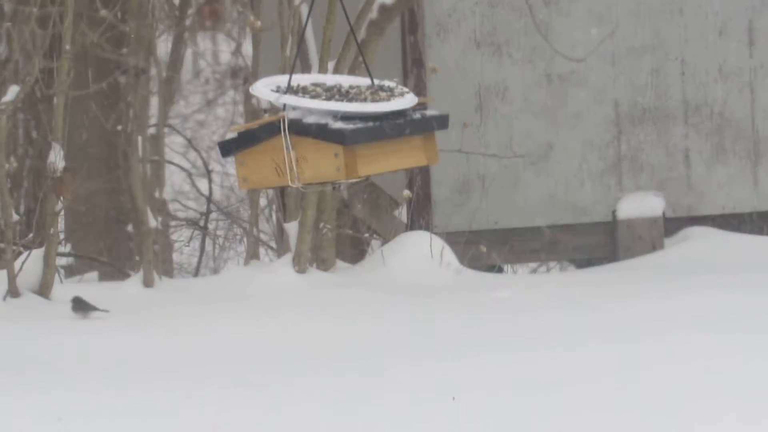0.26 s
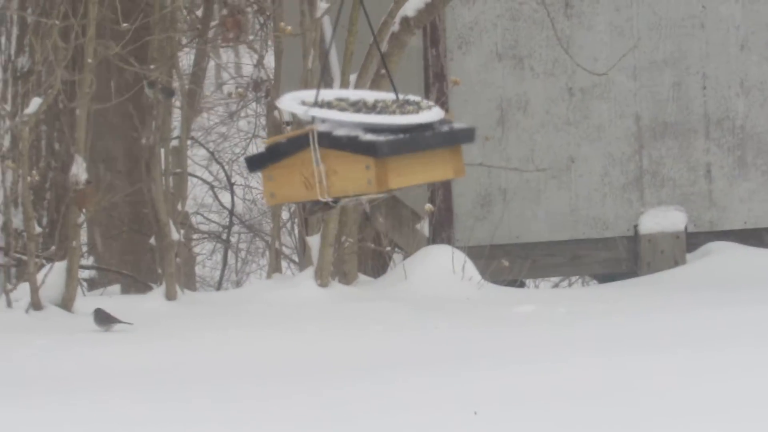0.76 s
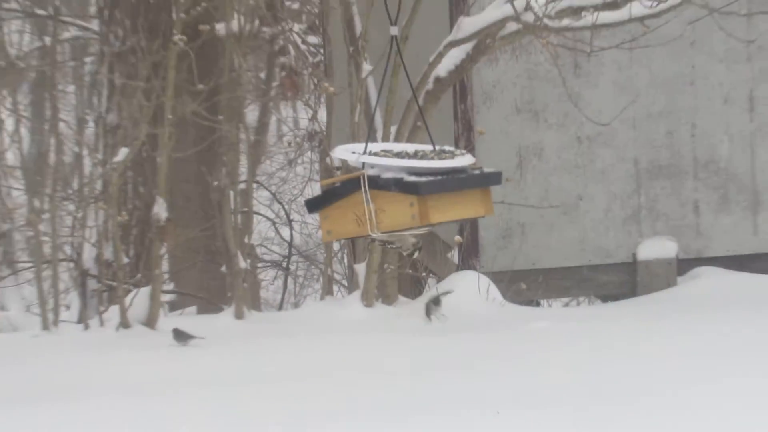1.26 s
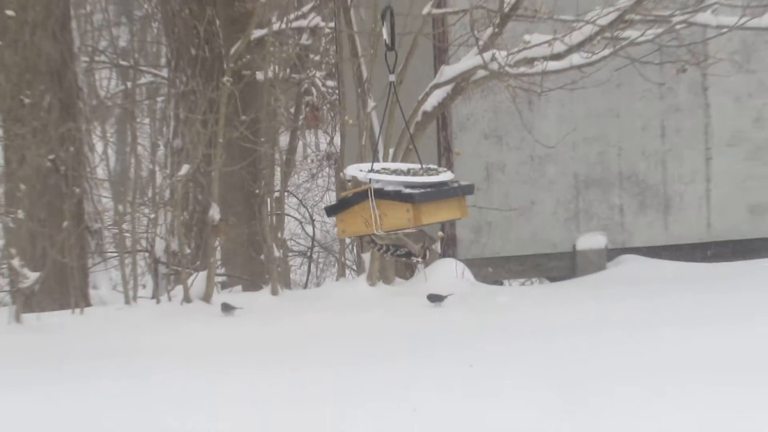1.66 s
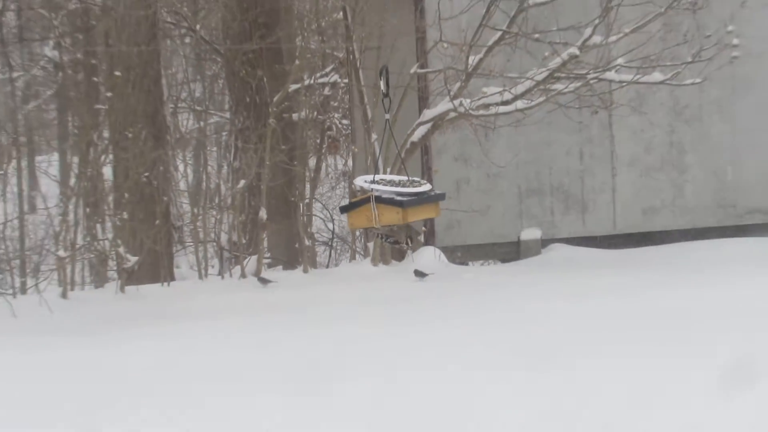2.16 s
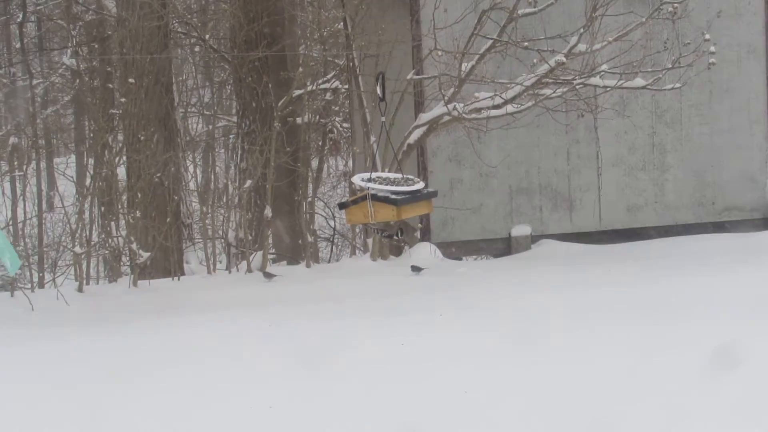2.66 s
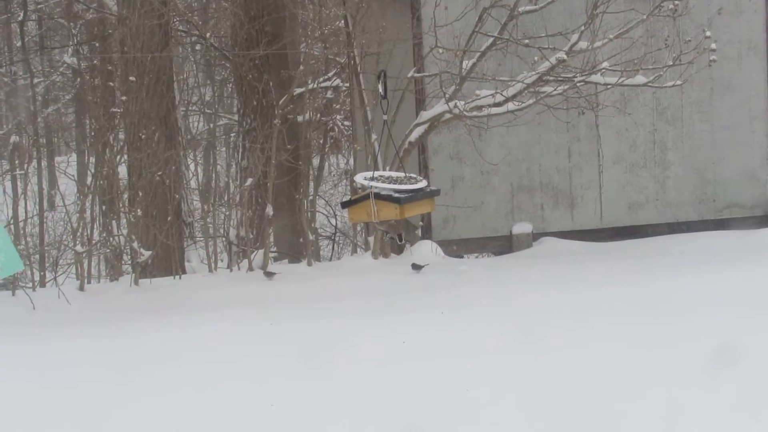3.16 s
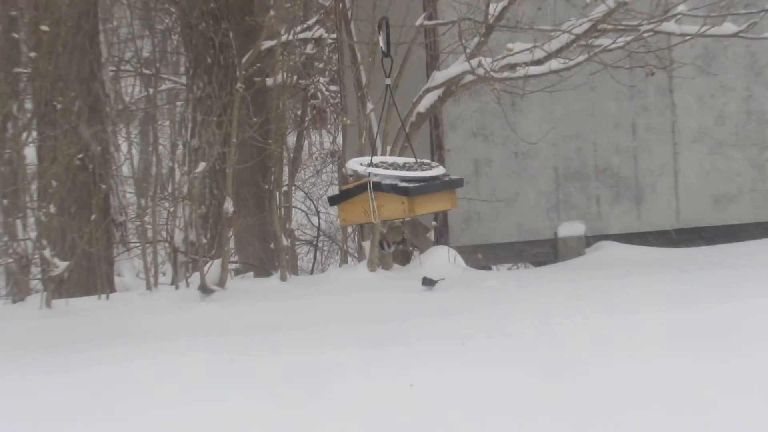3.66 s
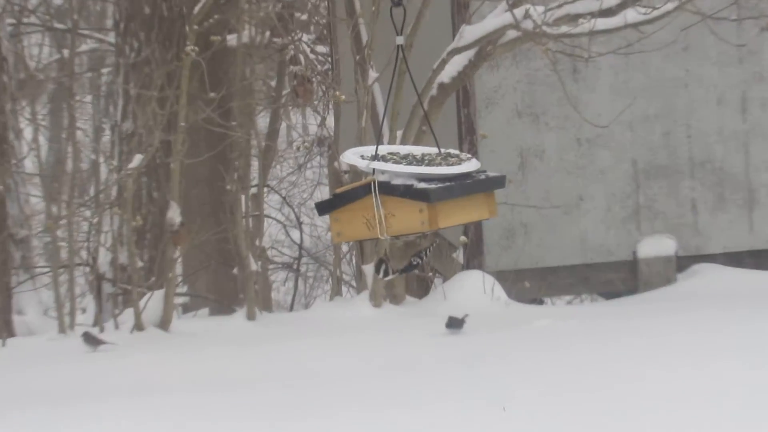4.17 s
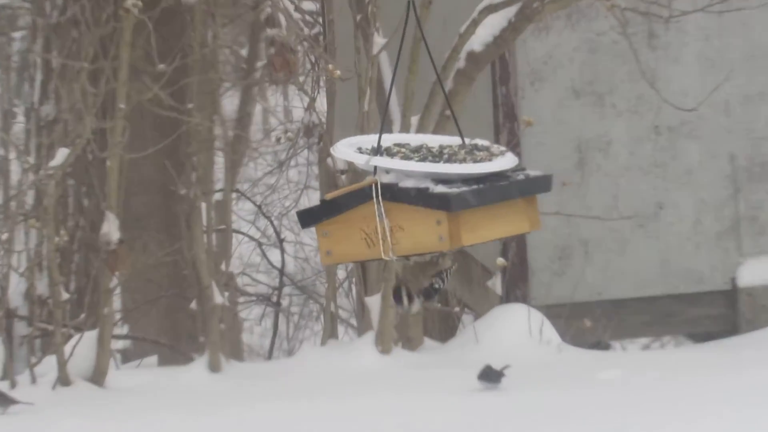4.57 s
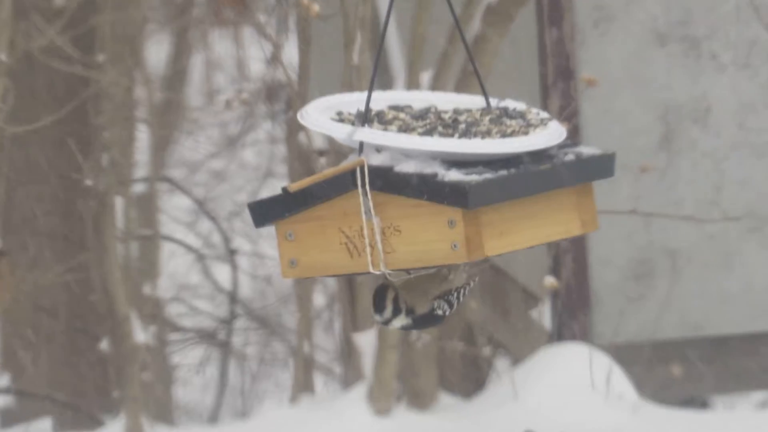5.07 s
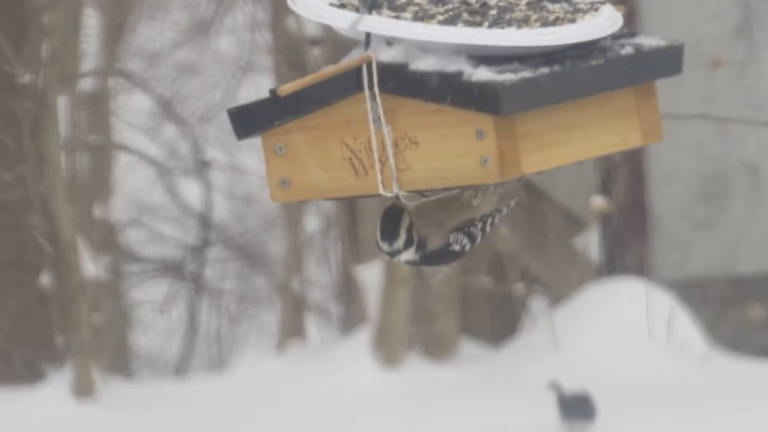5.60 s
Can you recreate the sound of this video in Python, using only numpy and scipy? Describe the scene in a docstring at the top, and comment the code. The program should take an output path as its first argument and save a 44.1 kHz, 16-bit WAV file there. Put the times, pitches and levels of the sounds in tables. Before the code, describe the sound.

Very close handling noise on a small camera: loud dry clicks, scuffs and small creaks of fingers on plastic for the first second. A grainy zoom motor then buzzes for over a second and stops. A quiet gap follows with faint ticking, low hum and soft bumps. A hard double click starts a longer whir of about two seconds, which ends with a click and quiet hiss.

```python
"""Zooming a small camera

A small hand-held camera zooms out and in again; its microphones hear the lens motor through the casing.
The motor knocks on the lens barrel about 200 times a second, over a low rumble, a step tone and gear hiss.
Fingers click the zoom lever and rub the plastic (ringing casing modes); the idle lens drive ticks.
A low hum of filtered noise swells and fades; dull thuds, creaks and microphone hiss join in.
The right microphone gets an inverted, duller copy of the left."""
import sys
import numpy as np
from scipy import signal
from scipy.io import wavfile

SR = 44100
rng = np.random.default_rng(int(sys.argv[2]) if len(sys.argv) > 2 else 0)


def linear_from_db(decibels):
    """Turn decibels (scalar or array-like) into linear amplitude factors; 0 gives 1."""
    return 10 ** (np.asarray(decibels, float) / 20)


def generate_wav(signal):
    """Clip the signal to [-1, 1] and save it as 16-bit WAV at the path in sys.argv[1]."""
    frames = np.transpose(np.atleast_2d(signal))
    scaled = np.clip(frames, -1, 1) * 32767
    pcm = np.round(scaled).astype(np.int16)
    wavfile.write(sys.argv[1], SR, pcm)


N = 257367

# notes that the casing rings when struck: (pitch_hz, level_db, t60_s = time to fade by 60 dB)
CASING_MODES = [(129.6, -12.5, 0.026), (375, -0.5, 0.038), (920, -4.5, 0.025), (1231, -7.5, 0.031),
                (1518, -8, 0.01), (2025, -8.5, 0.02), (2344, -5.5, 0.024), (2606, -0.5, 0.013),
                (3180, -3.5, 0.011), (3654, -7, 0.012), (4295, -21.5, 0.0078)]
# motor runs: (start_s, full_speed_from_s, full_speed_until_s, stop_s)
MOTOR_RUNS = [(1.097, 1.24, 2.305, 2.424), (3.31, 3.395, 5.49, 5.483)]


def rms_one(x):
    """Scales so that the mean of both channels has rms 1."""
    middle = np.mean(np.atleast_2d(x), axis=0)
    return x / np.sqrt(np.mean(middle ** 2) + 1e-20)


def in_time(spans):
    """Joins the rows of each span by straight lines; levels are silent (-150 dB) outside the spans."""
    t = np.arange(N) / SR
    out = np.full((len(spans[0][0]) - 1, N), -150.)
    for rows in spans:
        s, *columns = np.transpose(rows)
        inside = (t >= s[0]) & (t <= s[-1])
        out[:, inside] = [np.interp(t[inside], s, c) for c in columns]
    return out


def smooth(x, hz):
    """Low-pass with one pole: slow changes pass, fast ones fade."""
    r = np.exp(-2 * np.pi * hz / SR)
    return signal.lfilter([1 - r], [1, -r], x)


def drift(rate_hz):
    """Slow random wandering with rms 1."""
    noise = rng.standard_normal(N + SR)
    slow = smooth(smooth(noise, rate_hz), rate_hz)
    return rms_one(slow[SR:])   # the first second lets the filters settle


def resonate(x, modes, order=1):
    """Resonances side by side with alternating signs; a higher order steepens their skirts."""
    out = 0
    for k, (hz, width_hz, db) in enumerate(modes):
        r = np.exp(-np.pi * width_hz / SR)
        section = [(1 - r * r) / 2, 0, (r * r - 1) / 2, 1, -2 * r * np.cos(2 * np.pi * hz / SR), r * r]
        out = out + (-1) ** k * linear_from_db(db) * signal.sosfilt([section] * order, x)
    return out


def casing_bands():
    """The casing modes above the two lowest as damped bands, for noise that is fed into them."""
    return [(hz, 5.8 / t60 + 200, db) for hz, db, t60 in CASING_MODES[2:]]


def dying_noise(at, db, t60):
    """Noise bursts that start at the given samples and die away."""
    starts = np.full(N, 1e-18)
    starts[at] = linear_from_db(db)
    envelope = signal.lfilter([1], [1, -linear_from_db(-60 / (t60 * SR))], starts)
    return envelope * rng.standard_normal(N)


def microphones(x):
    """The casing cancels a narrow band; the right side is inverted, low-passed with a null, plus late treble."""
    left = signal.lfilter(*signal.iirnotch(673, 3.37, SR), x)
    cut_hz, cut_q, right_db, treble_delay = 2290, 0.81, -4.3, 9   # delay in samples
    w = 2 * np.pi * cut_hz
    low_pass = signal.bilinear([1], [w ** -2, 1 / (w * cut_q), 1], SR)
    right = signal.lfilter(*low_pass, left)
    right = signal.lfilter(*signal.iirnotch(5400, 6.0, SR), right)
    right = right + resonate(left, [(970, 1700, -23.0)])   # a broad lift in the low mids
    late = np.pad(left, (treble_delay, 0))[:N]
    treble = resonate(late, [(12500, 1600, -4.5)], order=2)
    return np.array([left, treble - linear_from_db(right_db) * right])


def mic_hiss_db():
    """Hiss level: sinks at the start of each motor run, then climbs back at a steady rate."""
    level_db, dip_db, sink_s, climb_db_per_s = -64.5, 8.5, 0.12, 5
    since = np.arange(N) / SR - np.transpose(MOTOR_RUNS)[0][:, None]
    sinking = np.clip(since / sink_s, 0, 1)
    dips = sinking * np.clip(dip_db - climb_db_per_s * since, 0, None)
    return level_db - dips.sum(axis=0)


def mic_noise():
    """Each microphone's own hiss plus extra low noise, with the top treble cut."""
    white, other = rng.standard_normal((2, 2, N))
    low = linear_from_db(30) * smooth(smooth(other, 300), 300)
    noise = linear_from_db(mic_hiss_db()) * (white + low)
    return signal.sosfilt(signal.cheby2(8, 60, 14900, fs=SR, output="sos"), noise)


def hum():
    """A low hum of wavering noise in resonances, swelling and fading between the motor runs and under them."""
    # level of the hum over time: (time_s, level_db)
    hum_level = [(0.0, -45), (0.32, -63), (0.58, -55), (0.99, -48.5), (1.09, -100), (1.3, -67.5),
                 (2.37, -61), (3.1, -49.5), (3.5, -72.5), (4.19, -51), (5.12, -64), (5.66, -55),
                 (5.84, -51)]
    # resonances of the hum: (pitch_hz, width_hz, level_db)
    hum_bands = [(110, 140, -4), (170, 80, -4), (310, 110, 1), (530, 70, 0), (870, 200, -12),
                 (1300, 700, -19)]
    noise = rng.standard_normal(N) * linear_from_db(1.5 * drift(15))
    ringing = resonate(noise, hum_bands, order=2)
    return linear_from_db(in_time([hum_level])[0]) * rms_one(microphones(ringing))


def rubbing():
    """Dense uneven grains of skin on plastic ring the casing; scuffs press hard enough to wake its lower modes."""
    # slow rubbing of the fingers, one list for each stretch: (time_s, level_db)
    rub_level = [
        [(0, -39), (.06, -47.5), (.13, -40), (.3, -55), (.39, -44.5), (.49, -60), (.57, -47), (.68, -62),
         (.8, -43.5), (.94, -57), (1.1, -78)],
        [(2.42, -58), (2.47, -76), (2.94, -70), (2.97, -59.5), (3.2, -56.5), (3.32, -69)],
        [(5.478, -58), (5.52, -75), (5.84, -69)],
    ]
    # short scuffs of a finger or the lever: (start_s, length_s, level_db, low body level relative to it in db)
    scuff_list = [(0.757, 0.03, -38, -15.5), (0.88, 0.025, -36, -2.5), (0.919, 0.011, -32, -9.5),
                  (0.945, 0.05, -32.5, -7.5), (0.995, 0.018, -35, -5), (1.03, 0.019, -41.5, -13),
                  (1.06, 0.015, -33, -20), (2.553, 0.029, -57, 8.5), (3.024, 0.04, -56, -22),
                  (3.117, 0.03, -47, -7), (3.239, 0.043, -39.5, -20), (3.271, 0.012, -50, -21),
                  (3.286, 0.014, -41.5, -26), (3.297, 0.02, -39, 5), (5.405, 0.016, -37, 1),
                  (5.594, 0.036, -54, 6.5)]
    grains = rng.standard_normal(N) * linear_from_db(2.5 * rng.exponential(1, N))
    grains = grains * linear_from_db(1.1 * drift(90))
    bands = casing_bands()
    thin = rms_one(microphones(resonate(grains, bands[3:] + [(6300, 2400, -28.0)], order=2)))
    body = rms_one(microphones(resonate(grains, bands[:3], order=2)))
    t = np.arange(N) / SR
    out = smooth(linear_from_db(in_time(rub_level)[0]), 60) * thin
    for s, length, db, body_db in scuff_list:
        span = slice(round(s * SR), round((s + length) * SR))
        across = 2 * (t[span] - s) / length - 1   # runs from -1 to 1 through the scuff
        pressure = linear_from_db(db) * np.sqrt(np.clip(1 - across ** 2, 0, 1))
        out[:, span] += pressure * (thin[:, span] + linear_from_db(body_db) * body[:, span])
    return out


def thuds():
    """Dull bumps of the whole camera: a soft push sets one low mode of the body ringing."""
    # bumps: (start_s, level_db before the soft rise)
    bumps = [(0.811, -39), (0.897, -45), (2.559, -20), (3.305, -26), (5.415, -46), (5.611, -20)]
    pitch_hz, t60_s, rise_s = 286, 0.14, 0.0023
    t, out = np.arange(N) / SR, 0
    for s, db in bumps:
        age = np.clip(t - s, 0, None)
        shape = (1 - np.exp(-age / rise_s)) * linear_from_db(db - 60 * age / t60_s)
        out = out + shape * np.sin(2 * np.pi * pitch_hz * age)
    return microphones(out)


def contacts():
    """Every contact that strikes the casing: single clicks, idle ticks in pairs, the slips of the creaks and
    the chatter of the motor winding down."""
    # single clicks: (time_s, strike_db, low thump relative in db, bright crack relative in db, tilt_db_per_octave)
    single_clicks = [(0.137, 1, -27, -27, 0.5), (0.2368, -4, -59, -39.5, -5), (0.315, -12, -9, -66, -6),
                     (0.3598, -38.5, 6, -17, -20), (0.396, -13, -9, -40, -2.5), (0.5185, -38, -14, -32, -7),
                     (0.612, -19, 1.5, -35, -9), (0.6417, -25.5, 4.5, -31, -4),
                     (0.7188, -34.5, -18, -32, -6), (0.81, -13, -5, -33, -2), (0.8234, -14, -11, -39, 4),
                     (0.855, -16, -10, -37, 6), (0.8733, -14.5, -36, -36, 13),
                     (0.9153, -22.5, -26, -47, -11), (0.95, -16.5, -26, -39, -3),
                     (0.9602, -11, -10, -30, 9), (1.0354, -30, -41, -30, 5), (1.049, -28.5, -32, -25, 29),
                     (1.0779, -22.5, -38, -20, 23.5), (1.0994, -32, -28, -36, 3),
                     (1.1555, -31, -3.5, -20, 10), (1.1846, -35, 3.5, -21, 15),
                     (2.456, -40.5, -18, -37.5, -12), (2.5563, -34.5, 9.5, -48, 7),
                     (2.9922, -15.5, -34, -16, 10), (3.0516, -37.5, -10, -15, -23),
                     (3.1307, -36, 3, -10.5, 45), (3.25, -26.5, -34, -21, 22),
                     (3.2985, -6.5, -13, -20.5, 7), (3.3065, -10.5, -15, -29, 24.5),
                     (5.4068, -16.5, -0.5, -11.5, 12), (5.4085, -18.5, -19, -11.5, 26),
                     (5.536, -38, 8.5, -23, -13), (5.5956, -44, 11.5, -37, -3),
                     (5.6104, -35.5, 11, -20, 11)]
    # the idle lens drive ticks in pairs: (first_pair_s, until_s, first_tick_db, second_tick_db)
    idle_ticks = [(2.632, 3.14, -49, -44.5), (5.668, 5.83, -51.5, -48)]
    # runs of evenly spaced slips: the first two rows are creaks, the last is a chatter as the first motor run
    # winds down: # (first_s, last_s, number of slips, strike_db, low thump relative in db, bright crack
    # relative in db)
    slip_runs = [(0.881, 0.903, 5, -18.5, -7.5, -47), (0.9967, 1.01, 3, -18.5, -12, -46),
                 (2.2077, 2.3442, 8, -35, 7.5, -17)]
    pair_every_s, pair_gap_s, tick_spread_db = .06673, .025, 2.5
    tick_colour = (2.8, -31, -4)   # low thump, bright crack and tilt, as for the clicks
    slip_spread_db, slip_tilt_spread_db = 4, 3   # tilt in dB per octave
    rows = list(single_clicks)
    for first, until, *pair_db in idle_ticks:
        for s in np.arange(first, until, pair_every_s):
            for k, db in enumerate(pair_db):
                tick_db = db + tick_spread_db * rng.standard_normal()
                rows.append((s + k * pair_gap_s, tick_db, *tick_colour))
    for first, last, slips, db, low_db, crack_db in slip_runs:
        for s in np.linspace(first, last, round(slips)):
            luck = rng.standard_normal(2)
            slip_db = db + slip_spread_db * luck[0]
            rows.append((s, slip_db, low_db, crack_db, slip_tilt_spread_db * luck[1]))
    return np.transpose(rows)


def clicks():
    """A soft contact strikes each mode with its own strength and lag; a crack and a rough tail go with it."""
    s, strike_db, low_db, crack_db, tilt_db = contacts()
    at, ringing = np.round(s * SR).astype(int), np.zeros(N)
    luck = rng.standard_normal((len(s), len(CASING_MODES)))
    lags = (rng.random(luck.shape) * 0.00098 * SR).astype(int)   # up to about a millisecond, in samples
    for k, (hz, db, t60) in enumerate(CASING_MODES):
        colour_db = low_db if hz < 1300 else tilt_db * np.log2(hz / 2600)
        blows = np.full(N, 1e-18)
        blows[at + lags[:, k]] = linear_from_db(strike_db + db + colour_db + 1.2 * luck[:, k])
        # each blow starts a dying sine wave
        r, w = linear_from_db(-60 / (t60 * SR)), 2 * np.pi * hz / SR
        ringing += signal.lfilter([0, np.sin(w)], [1, -2 * r * np.cos(w), r * r], blows)
    tail = resonate(dying_noise(at, strike_db - 2, 0.075), casing_bands())
    soft = signal.sosfilt(signal.butter(6, 4600, fs=SR, output="sos"), ringing + tail)
    crack_bands = [(6180, 1450, -0.5), (8900, 2100, -2.5), (13000, 3000, -12.0)]
    crack = resonate(dying_noise(at, strike_db + crack_db + 11.5, 0.013), crack_bands, order=2)
    return microphones(soft + crack)


def motor_controls():
    """Steps a second, and the levels of whirr, rumble, hiss and step tone: silent between runs, climbing within."""
    # loudness of each run: (settled whirr_db, start in db below that, treble hiss relative to the whirr in db)
    run_levels = [(-40.5, 14.5, -16.5), (-39, 5.5, -13.5)]
    # change of whirr, rumble, hiss and step tone (one row each) at creeping speed: (creep_in_db, creep_out_db)
    creep_change = [(3.5, -1.5), (0.5, -6), (-4.5, -5.5), (12, 1)]
    creep_per_s, full_per_s, ramp_s = 119, 199.8, .04   # steps a second; length of a speed change
    climb_s = 0.56
    rumble_db, tone_db = -4, -12.5   # relative to the settled whirr
    climb_share = [1, 1.33, 1.04, 2.85]   # dB of climb per dB of the whirr's climb, for the four layers
    t = np.arange(N) / SR
    per_s, levels = np.full(N, float(creep_per_s)), np.full((4, N), -150.)
    creep_in_db, creep_out_db = np.transpose(creep_change)[:, :, None]
    for (start, full, until, stop), (db, low_db, hiss_db) in zip(MOTOR_RUNS, run_levels):
        on = (t >= start) & (t <= stop)
        slow_in = np.clip((full - t[on]) / ramp_s + .5, 0, 1)
        slow_out = np.clip((t[on] - until) / ramp_s + .5, 0, 1)
        per_s[on] = full_per_s - (full_per_s - creep_per_s) * (slow_in + slow_out)
        below_db = low_db * np.exp(-(t[on] - start) / climb_s)
        settled_db = db + np.array([[0], [rumble_db], [hiss_db], [tone_db]])
        creeping_db = creep_in_db * slow_in + creep_out_db * slow_out
        levels[:, on] = settled_db - np.outer(climb_share, below_db) + creeping_db
    return per_s, levels


def motor():
    """Each step is one knock on the barrel plus dying friction noise; the rumble is lumpy, the hiss throbs."""
    # what the steps ring in the lens barrel: (pitch_hz, width_hz, level_db)
    barrel_modes = [(945, 490, -6), (1336, 400, -27), (1461, 180, -6), (1915, 310, -19), (2281, 128, -10.5),
                    (2640, 260, -2), (2830, 260, 0), (3120, 380, -7), (3560, 270, -2), (3666, 430, -7),
                    (4310, 530, -14.5)]
    # low shaking of the casing while the motor runs: (pitch_hz, width_hz, level_db)
    rumble_bands = [(66, 51, -0.5), (126, 118.4, -1.5), (221.6, 104.6, -1), (296.4, 29.8, 2),
                    (415, 167, -12.5)]
    # bright gear hiss: (pitch_hz, width_hz, level_db)
    gear_bands = [(5530, 210, -7.5), (6760, 1020, -10.5), (8200, 1140, -1.5), (9510, 1070, -2.5),
                  (12000, 1240, -12.5), (12780, 610, -12)]
    per_s, (whirr_db, rumble_db, hiss_db, tone_db) = motor_controls()
    phase = np.cumsum(per_s * (1 + .006 * drift(5))) / SR   # counts steps; the speed wavers slightly
    steps = np.flatnonzero(np.diff(phase.astype(int)))
    luck = rng.standard_normal((len(steps), 3))
    play = (luck[:, 0] * .0003 * SR).astype(int)   # play in the gears, in samples
    at = np.clip(steps + play, 0, N - 1)
    knocks = np.zeros(N)
    knocks[at] = np.sign(luck[:, 1]) * linear_from_db(0.5 * luck[:, 2])
    burst = np.exp(-4.0 * (phase % 1))   # dies away within each step
    friction = linear_from_db(-26) * rng.standard_normal(N) * (.6 + burst)
    whirr = resonate(knocks + friction, barrel_modes, order=2)
    rumble = resonate(rng.standard_normal(N) * linear_from_db(1.97 * drift(21.0)), rumble_bands)
    tone = np.cos(2 * np.pi * phase) * linear_from_db(1.0 * drift(11))
    # slower gear wheels turn once in three and six steps
    throb = 1 + 0.24 * np.cos(2 * np.pi * phase / 3) + 0.18 * np.cos(2 * np.pi * phase / 6)
    throb = throb * linear_from_db(1.5 * drift(30))
    hiss = resonate(rng.standard_normal(N) * (1.4 + burst) * throb, gear_bands, order=2)
    # the treble has a path of its own to the right microphone
    leak = resonate(rng.standard_normal(N), [(8600, 1800, -9.0), (12860, 3100, -16.5)])
    hiss = microphones(hiss) + leak * [[0], [1]]
    layers = ((whirr_db, microphones(whirr)), (rumble_db, microphones(rumble)),
              (tone_db, microphones(tone)), (hiss_db, hiss))
    return sum(smooth(linear_from_db(db), 51) * rms_one(x) for db, x in layers)


def scene():
    """All sources reach the microphones through the casing; each microphone adds its own hiss and low noise."""
    return mic_noise() + hum() + rubbing() + thuds() + clicks() + motor()


def roll_off(x):
    """The treble ends steeply here."""
    return signal.sosfilt(signal.butter(12, 16320, fs=SR, output="sos"), x)


def record(dry):
    """The deepest bass is cut, and peaks too loud for the input are clipped flat."""
    dry = signal.sosfilt(signal.butter(2, 40, "high", fs=SR, output="sos"), dry)
    mix = np.clip(dry, -1, 1)
    return roll_off(mix)


dry = scene()
out = record(dry)
generate_wav(out)
```